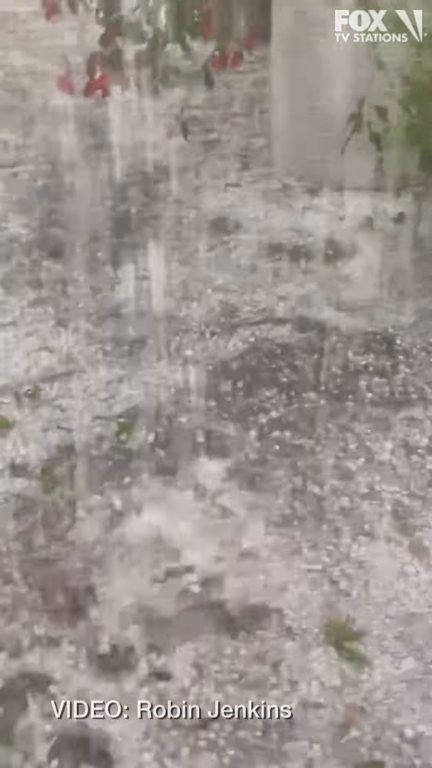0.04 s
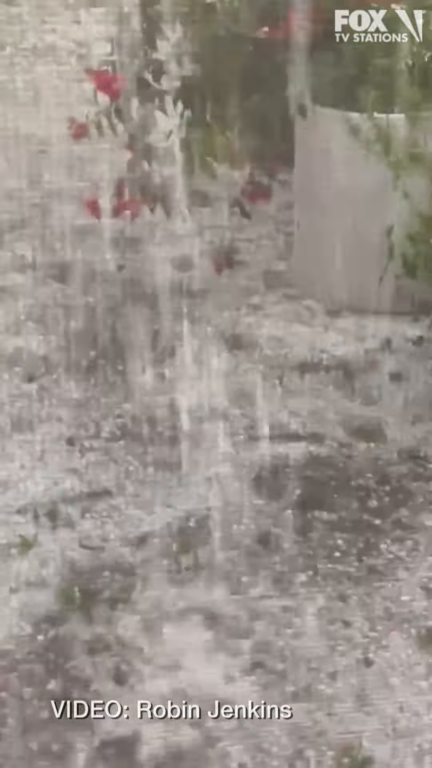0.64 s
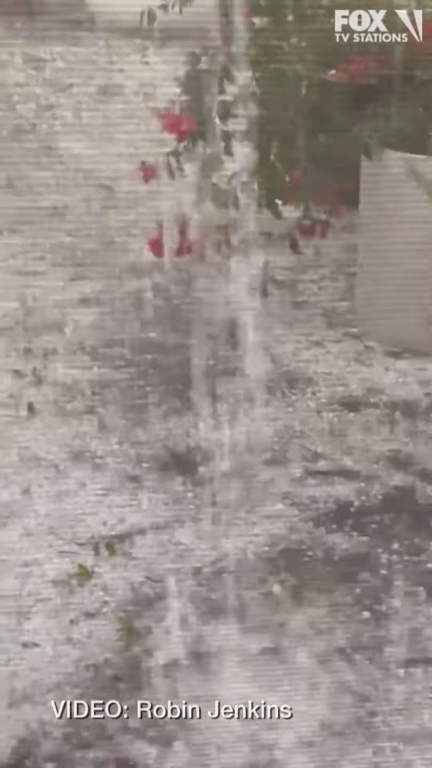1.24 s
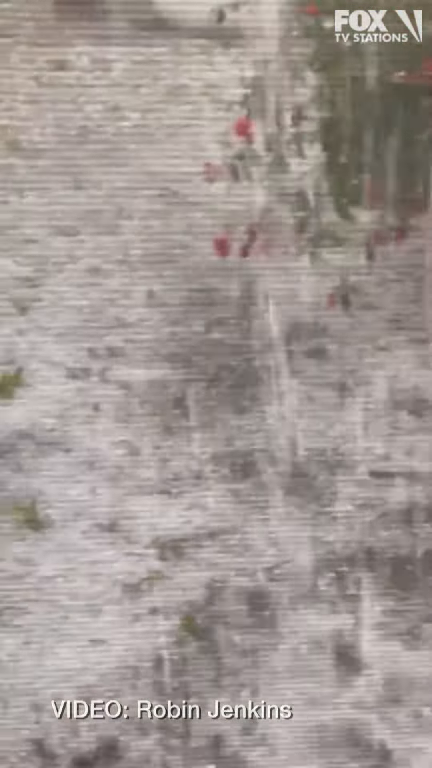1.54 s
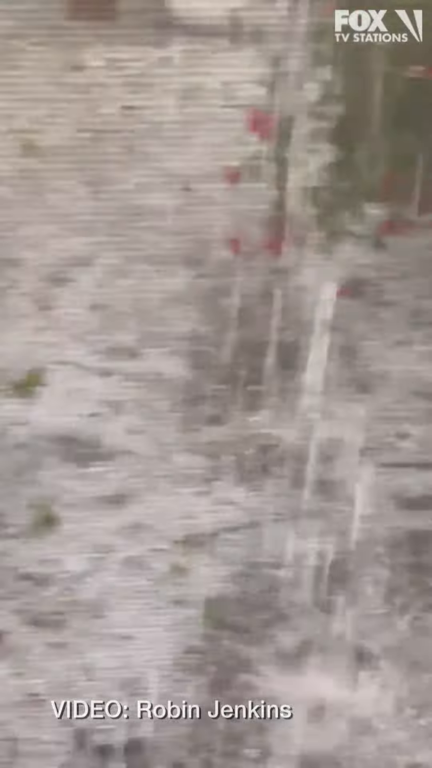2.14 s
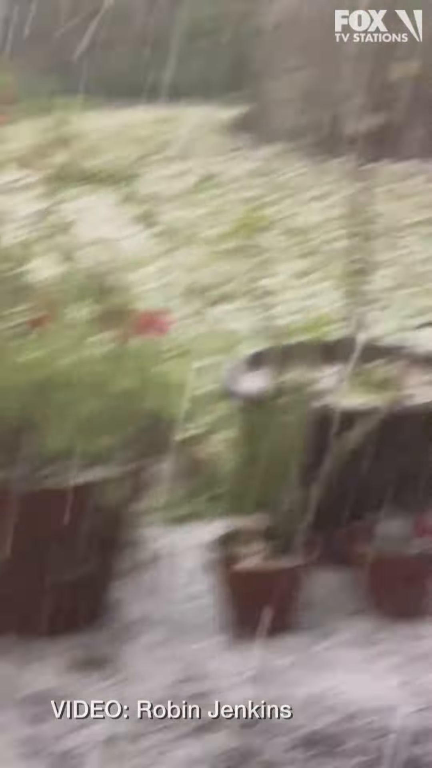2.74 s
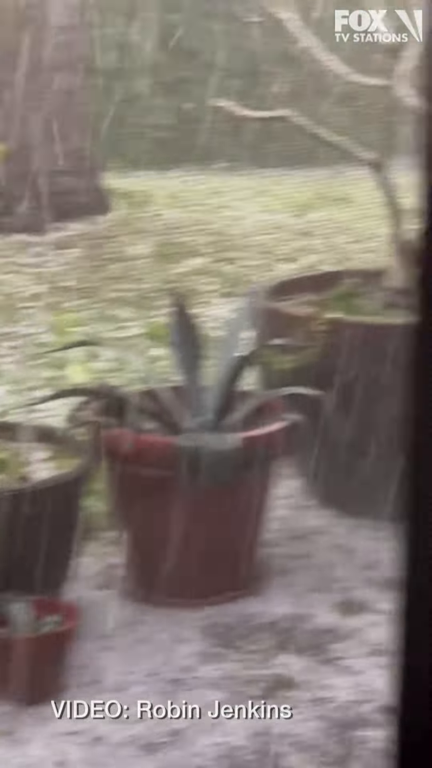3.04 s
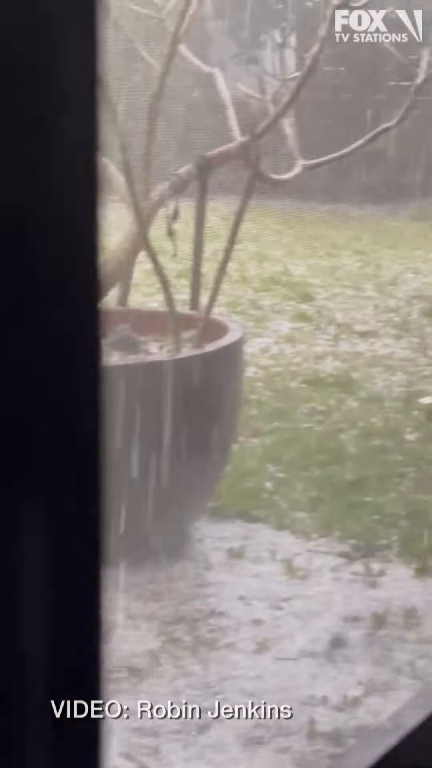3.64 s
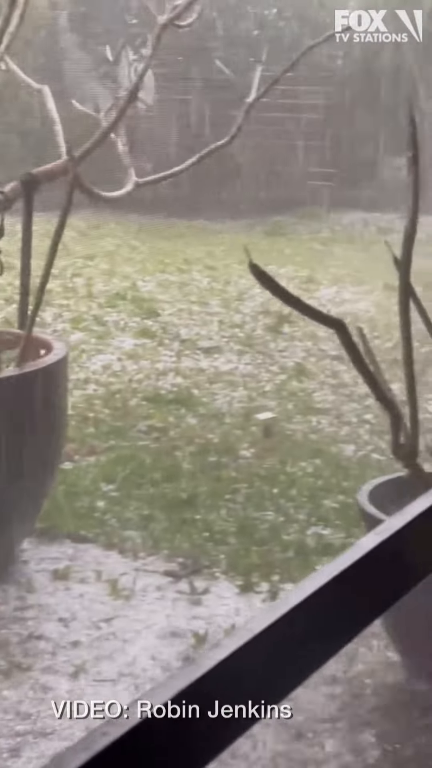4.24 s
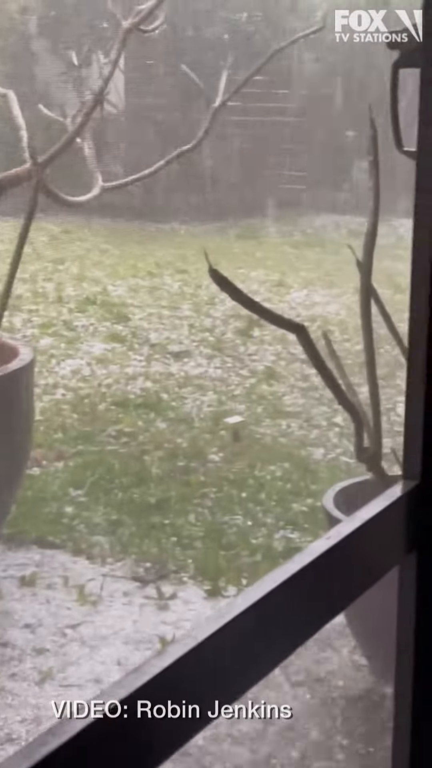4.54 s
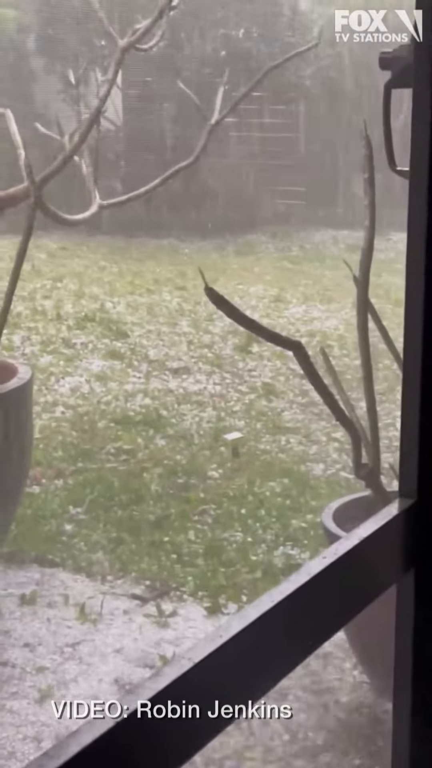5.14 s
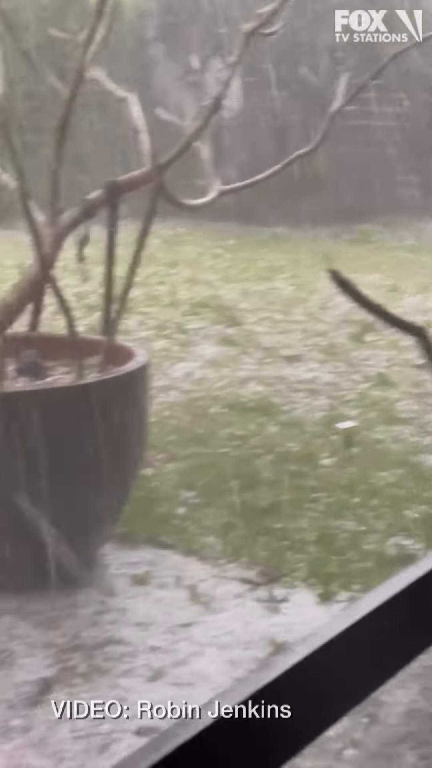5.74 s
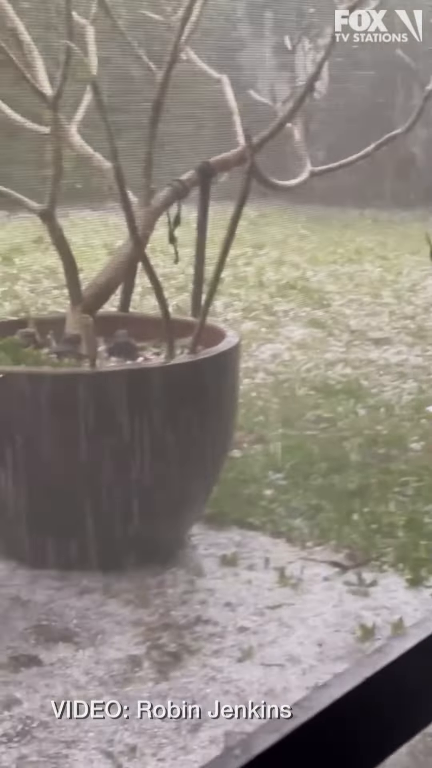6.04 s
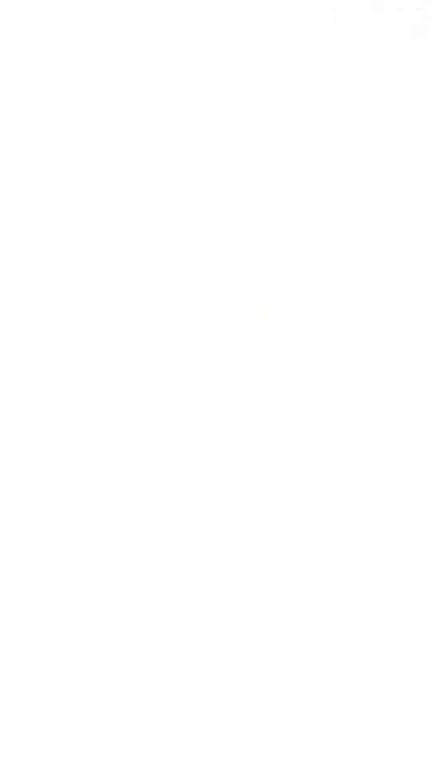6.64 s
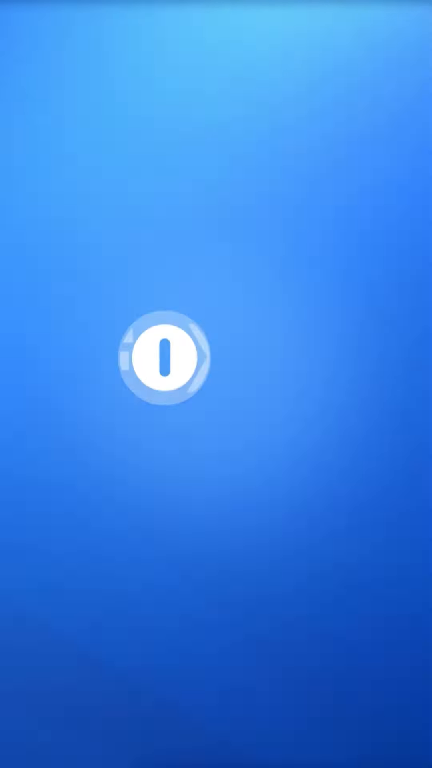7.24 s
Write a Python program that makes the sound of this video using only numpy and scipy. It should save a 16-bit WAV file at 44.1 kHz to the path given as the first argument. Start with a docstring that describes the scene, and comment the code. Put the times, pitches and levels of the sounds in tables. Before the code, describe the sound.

Hail and heavy rain pelt a patio and garden, heard from under a porch roof. Countless tiny impacts merge into a dense, bright hiss. Nearer stones crack on the wet paving and clack on plant pots and leaves, while the roof adds a low rumble with dull thumps. The shower swells and eases, grows slightly softer, then cuts off abruptly.

```python
"""Hail on a patio

Hail and heavy rain pelt a patio and its garden, heard from under a porch roof. Countless small impacts
superpose into a hiss; nearer stones ring pots and leaves, crack on the paving and drum dully on the roof.
The shower swells and eases, growing a little softer, then the sound is cut off."""
import sys
import numpy as np
from scipy import signal
from scipy.fft import rfft, irfft, next_fast_len
from scipy.io import wavfile
from scipy.ndimage import map_coordinates

SR = 44100
rng = np.random.default_rng(int(sys.argv[2]) if len(sys.argv) > 2 else 0)


def master(y):
    """Save y as 16-bit WAV."""
    cut = np.clip(np.atleast_2d(y).T, -1, 1)
    pcm = np.round(cut * 32767)  # scale
    wavfile.write(sys.argv[1], SR, pcm.astype(np.int16))


N = 325896

# spectral density of the small impacts: frequency_hz, level_db
IMPACT_SPECTRUM = [(30, -20.5), (120, -0.5), (300, -1), (550, -3), (900, -2.5), (1300, -2), (1800, -0.7),
                   (2500, -1.16), (3300, -2), (4500, -3.5), (6000, -1), (7800, 1.96)]
# colour of the treble, with narrow peaks and dips above 8 kHz: frequency_hz, gain_db
TREBLE_COLOUR = [(7800, 2), (8170, 0.7), (8340, 6.5), (8650, -0.5), (8900, -22), (9280, -26.5), (9590, 9),
                 (9780, 1.5), (11000, 7.5), (11750, 0), (12050, -9), (12300, -15.5), (12500, -7),
                 (13500, -18.5), (15400, -20.5)]


def amp(db):
    """Decibels to amplitude ratio."""
    return 10 ** (np.asarray(db) / 20)


def unit(x):
    """Normalisation to rms 1."""
    return x / np.sqrt(np.mean(x ** 2) + 1e-20)


def along(points, hz):
    """Interpolation of (frequency_hz, value) points on a logarithmic frequency axis."""
    frequencies, values = np.transpose(points)
    return np.interp(np.log(hz + 1), np.log(frequencies + 1), values)


def filtered(x, response):
    """Linear filtering: the spectrum is multiplied by a frequency response."""
    size = next_fast_len(N + 8192)
    return irfft(rfft(x, size) * response(np.fft.rfftfreq(size, 1 / SR)), size)[..., :N]


def below(hz, edge_hz):
    """Magnitude of a third-order Butterworth low-pass."""
    return 1 / np.sqrt(1 + (hz / edge_hz) ** 6)


def above(hz, edge_hz):
    """Magnitude of the power-complementary high-pass."""
    return np.sqrt(1 - below(hz, edge_hz) ** 2)


def grains(lo_hz, hi_hz, cycles, spread_db, count, samples):
    """Shot noise: damped oscillations at random times, each peaking after `cycles`. Rows: mid, side."""
    when, pitch, distance, phase, place = rng.random((count, 5)).T[:, :, None]
    hz = lo_hz + (hi_hz - lo_hz) * pitch
    k = np.arange(samples)
    turns = hz * k / SR
    age = turns / cycles
    height = amp(-spread_db * np.log(distance + .02)) * np.sqrt(hz)
    wave = height * age * np.exp(-age) * np.sin(2 * np.pi * (turns + phase))
    at = ((when * N).astype(int) + k).ravel()
    return np.array([unit(np.bincount(at, (wave * pan).ravel(), N)[:N]) for pan in (1, 2 * place - 1)])


def splashes(life_s, spread_db, count):
    """Incoherent addition: stones burst into brief puffs of noise whose powers sum. Rows: mid, side."""
    when, distance = rng.random((count, 2)).T
    energy = amp(-spread_db * np.log(distance + .03)) ** 2
    arrivals = np.bincount((when * N).astype(int), energy, N)
    age = np.arange(SR // 10) / (life_s * SR)
    power = signal.fftconvolve(arrivals, (age * np.exp(-age)) ** 2)[:N]
    return unit(np.sqrt(np.abs(power)) * rng.standard_normal((2, N)))


def flurries(depth_db, rate_hz):
    """Random amplitude modulation: a gain that wanders smoothly through rate_hz values a second."""
    drift = map_coordinates(rng.standard_normal(4096), [np.arange(N) * rate_hz / SR], mode="wrap")
    return amp(depth_db * drift)


def shower(db_per_db):
    """Power law: a surface's gain follows the shower's strength about its mean."""
    # strength of the shower at the porch: time_s, level_db
    strength = [(0, -22), (0.5, -23), (1.7, -23.5), (2.2, -23.5), (2.43, -24.5), (2.72, -23.4),
                (3.33, -24.5), (3.5, -24), (3.62, -25), (4.3, -25), (4.8, -26), (5.3, -25.5), (5.6, -26),
                (5.9, -24.5), (6.35, -25.5), (6.75, -25)]
    time_s, level_db = np.transpose(strength)
    swell_db = np.interp(np.arange(N) / SR, time_s, level_db - level_db.mean())
    return amp(db_per_db * swell_db)


def stereo_field(pair, colour):
    """Partial coherence: mid and side are coloured and mixed into left and right, at rms 1."""
    # likeness of the two channels: frequency_hz, coherence (0-1)
    coherence = [(130, .9999), (220, .996), (350, .97), (650, .83), (1400, .66), (1850, .992), (2300, .95),
                 (3100, .92), (4600, .9), (4880, .995), (5150, .9), (5600, .93), (5950, .997), (6400, .94),
                 (7000, .9), (8500, .985), (9000, .3), (9600, .95), (10000, .86), (11500, .88), (12500, .7),
                 (13300, .8), (13800, 0), (14400, .1), (14700, .9)]

    def response(hz):
        angle = np.arccos(np.clip(along(coherence, hz), 0, 1)) / 2
        return colour(hz) * amp(along(TREBLE_COLOUR, hz)) * np.array([np.cos(angle), np.sin(angle)])
    mid, side = filtered(pair, response)
    return unit(np.array([mid + side, mid - side]))


def roof(level_db=-40.5):
    """Forced vibration: dense impacts drive the porch roof, whose dull response merges into a rumble."""
    # response of the roof: frequency_hz, gain_db
    roof_response = [(15, -47), (25, -16.5), (109, -4.5), (330, -13), (430, -15.5), (730, -120)]
    thuds = splashes(life_s=0.0042, spread_db=-3.0, count=1800)
    drive = flurries(depth_db=0.54, rate_hz=11) * thuds
    rumble = stereo_field(drive, lambda hz: amp(along(roof_response, hz)))
    return amp(level_db) * shower(db_per_db=0.3) * rumble


def surges():
    """Amplitude modulation: clumps of hail on the plants lift the patter in Gaussian swells."""
    # clumps of hail: centre_s, length_s, gain_db
    clumps = [(0.66, 0.083, 3), (1.05, .16, 3.5), (1.688, 0.027, 6.5), (2.045, 0.035, 3.5),
              (2.348, 0.018, 4.5), (2.71, .2, 0.5), (3.51, 0.03, 4), (4.38, 0.16, 1.5), (6.025, 0.038, 0)]
    t = np.arange(N) / SR
    return amp(sum(db * np.exp(-(2 * (t - centre_s) / length_s) ** 2) for centre_s, length_s, db in clumps))


def garden(level_db=-28):
    """Superposition: taps on leaves, pots and soil add to the even wash of rain farther out."""
    taps = grains(lo_hz=443, hi_hz=5690, cycles=1.0, spread_db=-0.5, count=17000, samples=192)
    clacks = amp(-6) * grains(lo_hz=1400, hi_hz=4200, cycles=1.6, spread_db=3.8, count=3000, samples=512)
    slaps = splashes(life_s=0.0018, spread_db=3.0, count=3600)
    wash = amp(7.5) * rng.standard_normal((2, N))
    mix = flurries(depth_db=0.6, rate_hz=20) * (surges() * (taps + clacks) + slaps) + wash
    patter = stereo_field(mix, lambda hz: amp(along(IMPACT_SPECTRUM, hz)) * below(hz, edge_hz=4930))
    return amp(level_db) * shower(db_per_db=0.96) * patter


def paving(level_db=-24.5):
    """Brief contacts radiate high frequencies: ice ticks and water sprays on the wet slabs."""
    ticks = grains(lo_hz=3480, hi_hz=14520, cycles=4.7, spread_db=1.0, count=14000, samples=128)
    spray = amp(3.0) * splashes(life_s=0.0043, spread_db=2.5, count=1600)
    hiss = amp(5.5) * rng.standard_normal((2, N))
    mix = flurries(depth_db=0.91, rate_hz=22) * (ticks + spray) + hiss
    sizzle = stereo_field(mix, lambda hz: amp(along(IMPACT_SPECTRUM, hz)) * above(hz, edge_hz=4060))
    return amp(level_db) * shower(db_per_db=1.07) * sizzle


def pots(t60_s=0.026, gain_db=-8):
    """Damped free vibration: a struck pot or stiff leaf gives one rough tone; lower ones ring longer."""
    # stones on pots and leaves: start_s, level_db, pitch_hz
    strikes = [(0.055, -18, 915), (0.437, -17, 470), (0.743, -14, 1370), (0.829, -10, 4130),
               (1.081, -9.5, 2000), (1.274, -10, 3440), (1.385, -12.5, 2130), (1.475, -23.5, 450),
               (1.680, -10, 2470), (2.340, -13, 1780), (2.353, -10.5, 1780), (2.662, -8.5, 2170),
               (2.788, -13, 1800), (3.118, -9.5, 2520), (3.296, -21, 418), (3.814, -16.5, 1230),
               (3.817, -18.5, 553), (3.843, -15.5, 1250), (4.136, -23, 750), (4.348, -25, 533),
               (4.386, -15, 2190), (4.489, -12, 1940), (4.631, -14, 3380), (4.741, -13, 2050),
               (4.752, -23.5, 463), (4.911, -19, 805), (4.955, -14, 1950), (5.073, -17, 1600),
               (5.19, -23, 3620), (5.962, -12, 2560), (6.015, -21.5, 1260), (6.016, -12, 1880),
               (6.317, -17, 3850), (6.346, -23, 1080), (6.414, -11, 1900)]
    t = np.arange(SR // 12) / SR
    out = np.zeros(N)
    for start_s, level_db, pitch_hz in strikes:
        # a random walk in phase makes the tone a clack rather than a ping
        waver = .5 * np.cumsum(rng.standard_normal(len(t))) * np.sqrt(pitch_hz / SR)
        ring_s = t60_s * np.sqrt(1800 / pitch_hz)
        envelope = amp(level_db + gain_db - 60 * t / ring_s)
        at = round(start_s * SR)
        out[at:at + len(t)] += envelope * np.sin(2 * np.pi * pitch_hz * t + waver)
    return out


def hailstones(crack_hz=10400, click_hz=2800, knock_t60_s=0.011, chips_t60_s=0.014):
    """Impact transients: near stones crack and click on a slab; a knock and a scatter of chips decay."""
    # big stones on the slabs: start_s, ice_db, slab_db
    stones = [(0.112, -14, -13.5), (0.669, -16, -13.5), (0.7753, -11.5, -23), (0.830, -15, -15.5),
              (0.930, -21, -16), (0.992, -20, -13), (1.0687, -11, -13.5), (1.1762, -8.5, -28.5),
              (1.319, -19, -12.5), (1.524, -10.5, -20.5), (1.5888, -8.5, -11.5), (1.604, -8, -21),
              (1.735, -19, -9.5), (1.767, -20.5, -15.5), (2.026, -14, -21), (2.562, -18, -9.5),
              (2.75, -5, -14.5), (2.8382, -9, -28), (3.1517, -5, -25.5), (3.4666, -8, -12.5),
              (3.5012, -4, -13.5), (3.5434, -9.5, -19), (3.930, -16, -15), (4.288, -23, -18.5),
              (4.411, -7.5, -22), (4.438, -8, -24.5), (4.4897, -7.5, -25), (5.2613, -12.5, -23),
              (5.2774, -11.5, -17.5), (5.714, -10, -26), (5.893, -8, -23), (6.6147, -16, -26),
              (6.6592, -9, -25)]
    t = np.arange(SR // 16) / SR

    def snap(hz, life_s):
        return t / life_s * np.exp(1 - t / life_s) * np.sin(2 * np.pi * hz * t)
    ticks, knock_envelope, chips_envelope = np.zeros((3, N))
    for start_s, ice_db, slab_db in stones:
        size = np.exp(0.045 * rng.standard_normal())  # larger stones sound lower
        at = round(start_s * SR)
        span = slice(at, at + len(t))
        ticks[span] += amp(ice_db) * snap(crack_hz / size, life_s=0.00011)
        ticks[span] += amp(slab_db) * snap(click_hz / size, life_s=0.00014)
        knock_envelope[span] += amp(slab_db - 1 - 60 * t / knock_t60_s)
        chips_envelope[span] += amp(ice_db - 8 - 60 * t / chips_t60_s)
    knock = knock_envelope * rng.standard_normal(N)
    knock = filtered(knock, lambda hz: above(hz, edge_hz=1100) * below(hz, edge_hz=6100))
    chips = chips_envelope * rng.standard_normal(N)
    chips = filtered(chips, lambda hz: above(hz, edge_hz=5400) * amp(along(TREBLE_COLOUR, hz)))
    return filtered(ticks + chips, lambda hz: below(hz, edge_hz=11500)) + knock


def roof_booms(t60_s=0.19, attack_s=0.028):
    """Plate resonance: a heavy stone flexes a roof panel, which booms at its natural frequency."""
    # heavy stones on the roof: start_s, level_db, pitch_hz
    strikes = [(0.19, -24, 113), (0.28, -26, 276), (0.359, -28.5, 179), (0.425, -22, 122),
               (0.624, -25.5, 129), (1.476, -24, 253), (1.646, -34, 108), (1.775, -25.5, 189.4),
               (2.025, -22, 366), (2.135, -27, 120), (2.579, -27, 279), (2.715, -23.5, 89),
               (2.785, -23, 111), (3.055, -24.5, 175), (3.14, -26, 111), (3.254, -29.5, 178),
               (3.45, -25, 156), (3.665, -28, 102), (3.88, -24, 162), (4.94, -24, 128), (5.537, -22.5, 151),
               (5.652, -23.5, 119), (5.832, -30, 77), (6.305, -23, 164), (6.428, -24, 119)]
    t = np.arange(SR // 6) / SR
    envelope = (1 - np.exp(-t / attack_s)) * amp(-60 * t / t60_s)
    out = np.zeros(N)
    for start_s, level_db, pitch_hz in strikes:
        at = round(start_s * SR)
        out[at:at + len(t)] += amp(level_db) * envelope * np.sin(2 * np.pi * pitch_hz * t)
    return out


def scene():
    """Linear superposition of all sources, left and right."""
    return roof() + roof_booms() + garden() + paving() + pots() + hailstones()


def record(dry):
    """Phase and level differences separate two microphones; the sound is band-limited and cut off."""
    # lead of the left microphone: frequency_hz, phase_rad
    phase_lead = [(1700, 0), (1950, .1), (2500, .65), (4100, .75), (4600, 1.6), (4880, 3.14), (5150, 5),
                  (5750, 6.28), (6150, 6.28), (6400, 6.85), (8150, 8.8), (8350, 6.28), (11600, 6.28),
                  (11750, 3.7), (12200, 4), (12400, 6.28)]
    # left level minus right: frequency_hz, difference_db
    balance = [(200, 0), (700, 1.9), (1700, 0)]
    low_hz, top_hz = 41, 15700
    cut_s, fade_t60_s = 6.777, .025
    side = np.array([[.5], [-.5]])
    pair = filtered(dry, lambda hz: np.exp(1j * side * along(phase_lead, hz))
                    * amp(side * along(balance, hz)))
    pair = filtered(pair, lambda hz: above(hz, low_hz))
    gate = amp(-60 * np.clip((np.arange(N) / SR - cut_s) / fade_t60_s, 0, 3))
    return filtered(pair * gate, lambda hz: 1 / (1 + (hz / top_hz) ** 200))


dry = scene()
out = record(dry)
master(out)
```